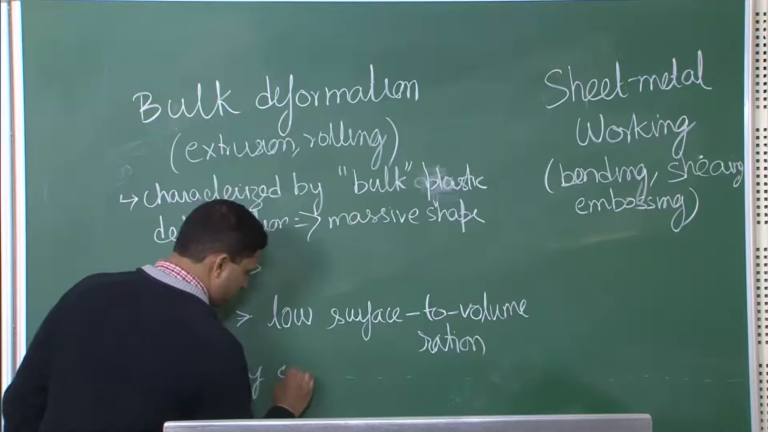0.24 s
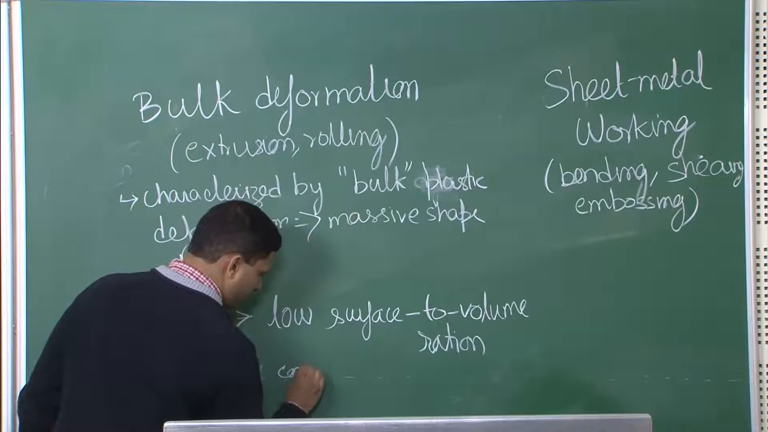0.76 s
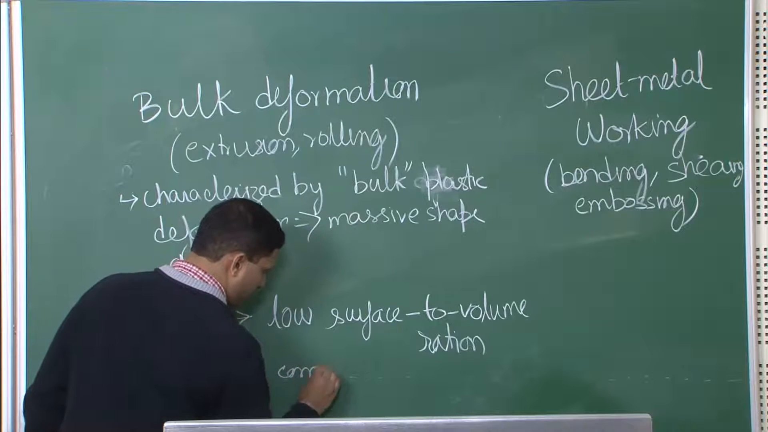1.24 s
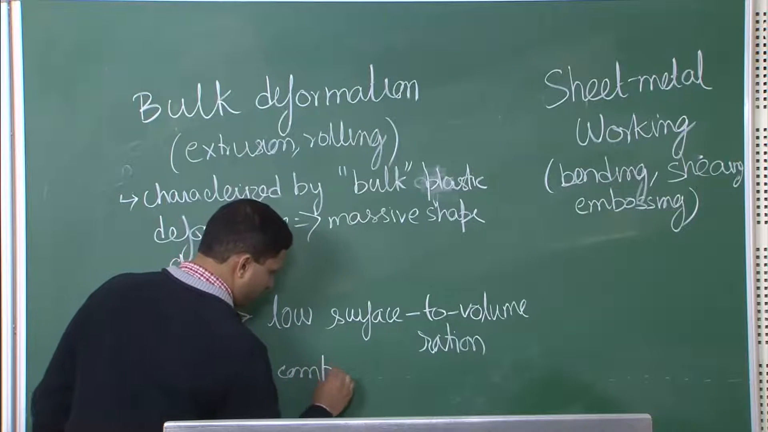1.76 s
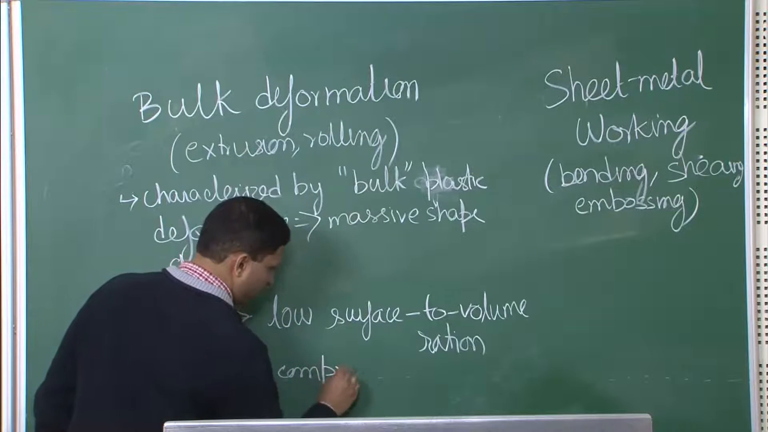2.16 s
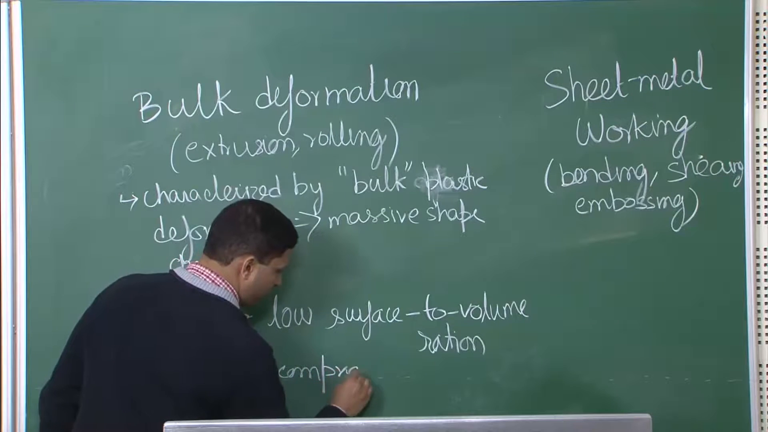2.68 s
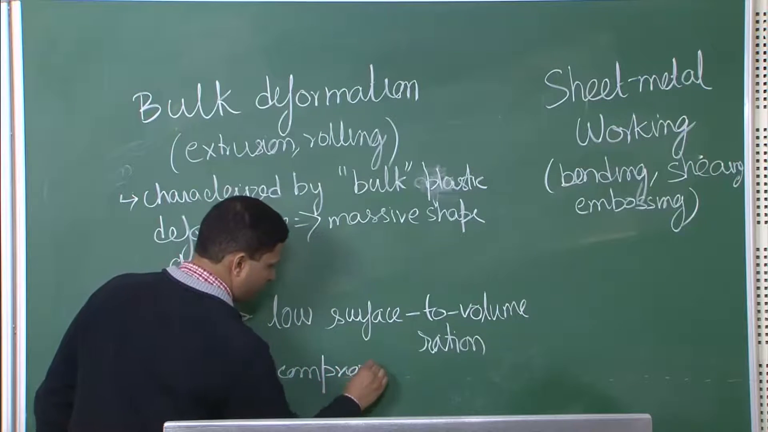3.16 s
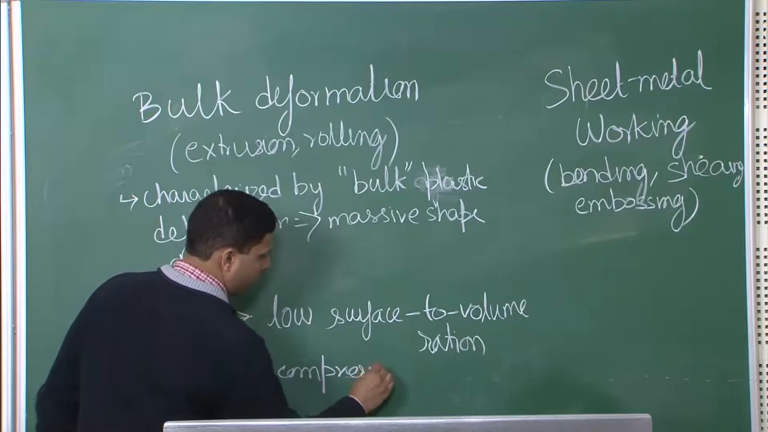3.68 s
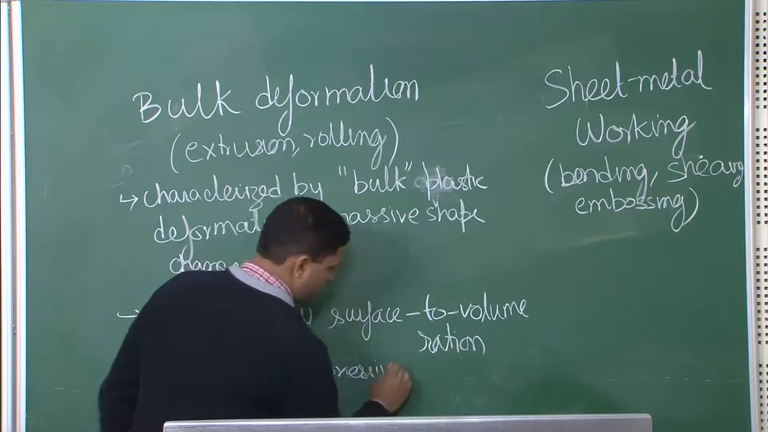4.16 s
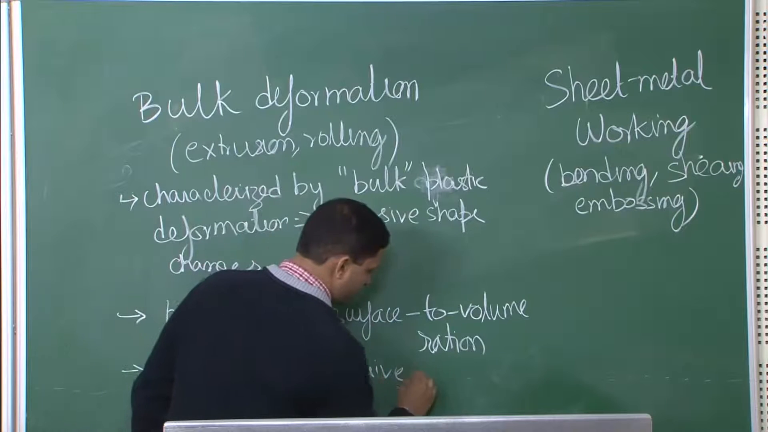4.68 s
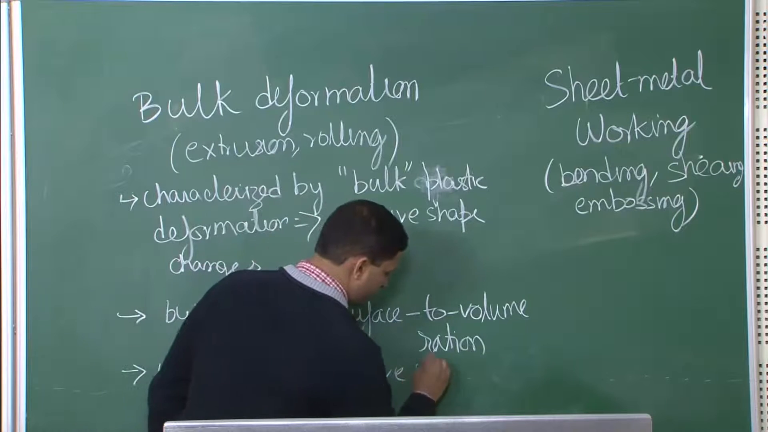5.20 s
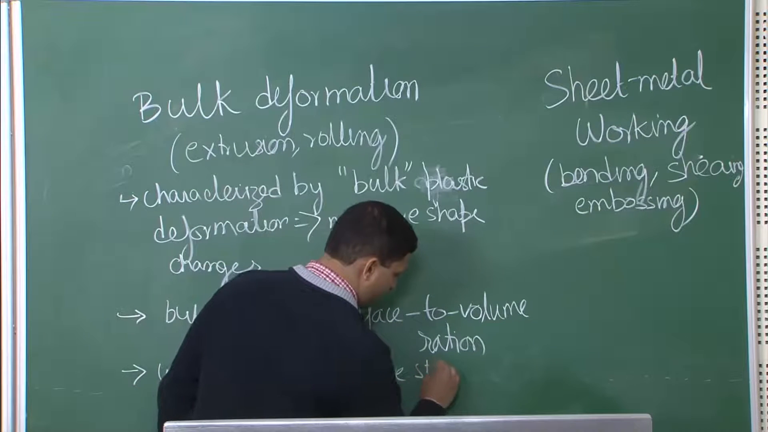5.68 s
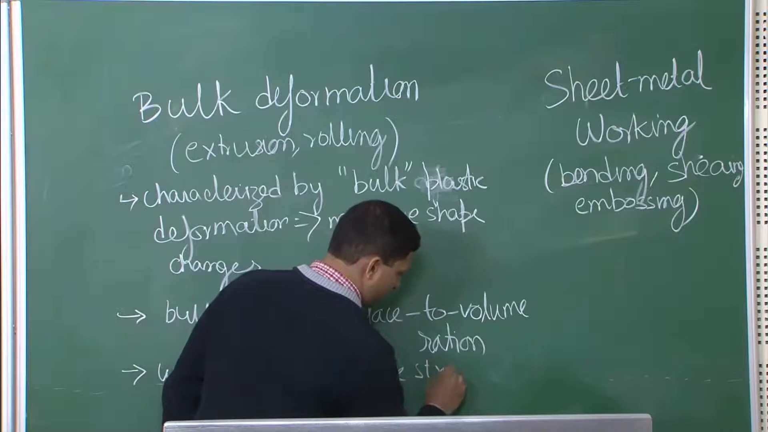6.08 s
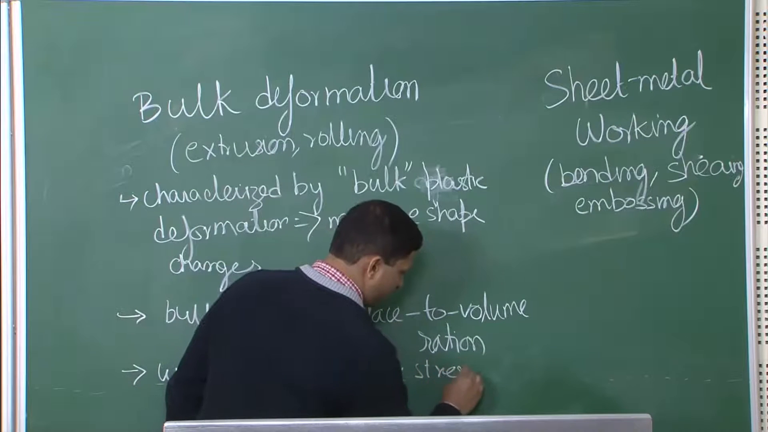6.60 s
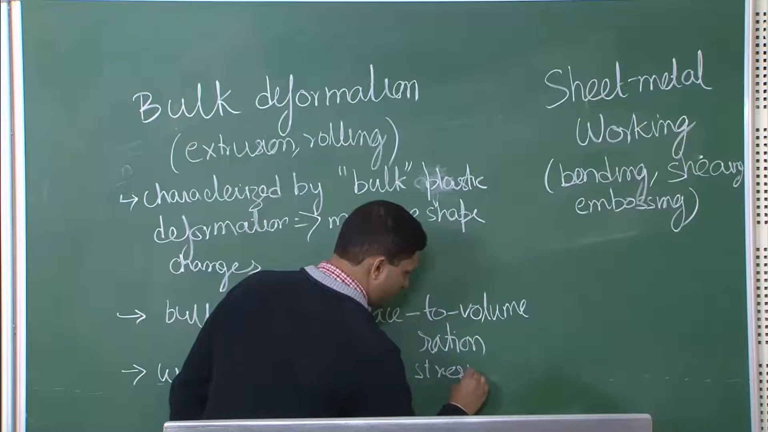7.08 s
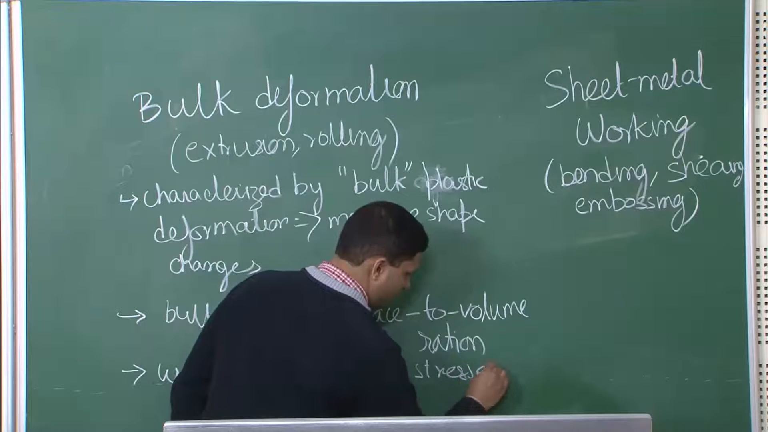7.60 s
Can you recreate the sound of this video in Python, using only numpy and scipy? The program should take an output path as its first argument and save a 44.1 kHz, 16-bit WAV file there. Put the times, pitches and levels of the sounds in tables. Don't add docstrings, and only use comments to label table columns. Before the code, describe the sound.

Quick, hissing chalk strokes and scattered hard clicks of the tip knock a large board in a quiet, lightly echoing room with humming air.

```python
import sys
import numpy as np
from scipy import signal
from scipy.fft import rfft, irfft, next_fast_len
from scipy.io import wavfile
from scipy.ndimage import uniform_filter1d

SR = 44100
rng = np.random.default_rng(int(sys.argv[2]) if len(sys.argv) > 2 else 0)


def transcribe(signal):
    frames = np.atleast_2d(signal).T
    limited = np.clip(frames, -1, 1)
    pcm = np.round(limited * 32767).astype(np.int16)
    wavfile.write(sys.argv[1], SR, pcm)


def volts_from_decibels(level):
    exponent = np.asarray(level, float) / 20
    return 10 ** exponent


N = 346076

# time in seconds, upper over deep boom in dB,
# echo delay off the hand in ms, echo delay off the ledge in ms.
HAND_PLACE = [(1.3, 8, .93, 6.3), (1.69, 8, 1.29, 7.5), (1.99, 6.5, .9, 6.25), (2.4, 7, .93, 6.0),
              (3.5, .4, .65, 6.05), (3.95, -4, .66, 6.45), (4.3, 5, .86, 6.3), (4.8, 3, .9, 6.65),
              (5.66, 0.4, .9, 6.7), (6.05, 5, .86, 6.8), (7.2, 3, .95, 6.25)]


def level(x, db):
    return x * volts_from_decibels(db) / np.sqrt(np.mean(x ** 2))


def coloured(x, points):
    hz, db = np.transpose(points)
    size = next_fast_len(len(x))
    bins = np.fft.rfftfreq(size, 1 / SR) + 1
    gain = volts_from_decibels(np.interp(np.log(bins), np.log(hz), db))
    return irfft(rfft(x, size) * gain, size)[:len(x)]


def resonant(x, peaks):
    size = next_fast_len(len(x))
    bins = np.fft.rfftfreq(size, 1 / SR) + 1
    gain = sum(volts_from_decibels(db) / (1 + ((bins - hz ** 2 / bins) / width) ** 2) for hz, width, db in peaks)
    return irfft(rfft(x, size) * gain, size)[:len(x)]


def decay(t, t60):
    return np.exp(-np.log(1000) * t / t60)


def along(table, s):
    times, *columns = np.transpose(table)
    return [np.interp(s, times, column) for column in columns]


def ventilation():
    # frequency in Hz, spectrum level in dB.
    air = [(18, -48), (30, -16), (80, -9), (137, -7), (186, 0.5), (247, -4.5), (274, -1), (345, -6),
           (592, -12.5), (965, -8.5), (1250, -12.5), (1490, -13), (1610, -12.5), (3150, -29), (14000, -39)]
    # frequency in Hz, width in Hz, level in dB.
    hum_peaks = [(131, 24, -6), (182.6, 16, -0.5), (218, 39, -3), (328.8, 18, 0.5)]
    hum = level(resonant(rng.standard_normal(N), hum_peaks), -64.5)
    return level(coloured(rng.standard_normal(N), air), -62) + hum


def flutter(rate, depth_db):
    size = int(SR / rate)
    steps = np.repeat(rng.standard_normal(N // size + 1), size)[:N]
    return volts_from_decibels(depth_db * uniform_filter1d(steps, size))


def grit(scatter_db):
    size = np.minimum(rng.exponential(size=N), 7.5)
    return rng.standard_normal(N) * volts_from_decibels(scatter_db * size)


def patchy(peaks, rate, depth_db):
    return level(sum(resonant(grit(2.79), [peak]) * flutter(rate, depth_db) for peak in peaks), 0)


def arches():
    # middle in seconds, length in seconds, dust hiss in
    # dB, scrape over hiss in dB, rub over hiss in dB.
    stroke_rows = [(0.01, 0.033, -69, 4, 6), (0.15, 0.13, -64, 6, 0.5), (0.254, 0.087, -68, 3.5, 0),
                   (0.383, 0.093, -63.5, 5.5, 1), (0.503, 0.107, -66.5, 4.5, 4),
                   (0.628, 0.072, -65.5, 0.5, -11), (0.76, 0.12, -66.5, 4, 1.5),
                   (0.876, 0.074, -64, 3, -0.5), (1.006, 0.091, -66, 8, 2), (1.135, 0.097, -66.5, 2, -1),
                   (1.455, 0.13, -61, 3, -3), (1.739, 0.069, -60, 3.5, 2), (1.839, 0.07, -65.5, 6.5, 0),
                   (2.078, 0.089, -64.5, 2, 1.5), (2.234, 0.074, -63, 3.5, 4),
                   (2.491, 0.12, -67, 6, 4), (2.67, 0.14, -66, 3.5, -1.5), (2.765, 0.048, -64.5, 5, 8),
                      (2.83, 0.065, -65.5, -1, 4), (2.925, 0.075, -66, 2, -5),
                      (3.023, 0.061, -68.5, 9.5, 10), (3.102, 0.082, -68.5, 10, 9.5),
                      (3.17, 0.085, -71.5, 5, 9.5), (3.275, 0.065, -69, 8, 2), (3.39, 0.11, -76, 10, 13),
                      (3.587, 0.14, -70, 11.5, 9.5), (3.76, 0.11, -73, 15.5, 15.5),
                      (4.016, 0.11, -69, 10.5, 4.5), (4.146, 0.062, -69, 10, 13),
                      (4.357, 0.085, -71.5, 6, -8), (4.456, 0.062, -70, 9, 13.5),
                      (4.594, 0.16, -69, 7.5, -1), (4.661, 0.024, -64, 11.5, 10),
                      (4.912, 0.06, -64, 9.5, 1), (5.005, 0.073, -66.5, 7.5, 5),
                   (5.312, 0.117, -67, 7.5, 4), (5.566, 0.019, -64.5, 13.5, 13),
                    (5.753, 0.073, -61, 1.5, 1), (5.896, 0.087, -67, 0.5, 10.5), (6.079, 0.055, -66, 0, 3),
                    (6.175, 0.081, -63.5, 4, 3.5), (6.298, 0.077, -68.5, 4, 3), (6.382, 0.15, -67, 5, 2),
                    (6.523, 0.065, -63.5, 1, 2), (6.616, 0.075, -62, 2, -4.5), (6.702, 0.052, -65, 1.5, -4),
                    (6.8, 0.056, -67, 7, 2), (6.857, 0.03, -63.5, 2.5, 1), (6.955, 0.075, -61.5, -1.5, -3),
                    (7.055, 0.066, -72.5, 9, 3), (7.275, 0.11, -66.5, 6, 3), (7.401, 0.07, -63, 1.5, -1),
                    (7.482, 0.1, -62.5, 5.5, 0), (7.599, 0.069, -60.5, 0.5, -1.5),
                    (7.713, 0.076, -61, -0.5, -4.5), (7.796, 0.051, -60.5, 4.5, -2.5)]
    edge_db, squareness, lifted_db = 5, 3.3, -81
    t = np.arange(0, N + 64, 64) / SR
    letters = np.array(stroke_rows)
    mid, length, hiss_db, scrape_db, rub_db = letters.T[:, :, None]
    place = np.abs(2 * (t - mid) / length)
    power_law = np.where(t > mid, squareness / 0.98, squareness)
    arch = volts_from_decibels(hiss_db - edge_db * place ** power_law) ** 2
    tilt_db = 0.11 * (rub_db - scrape_db + 4)
    low_db = scrape_db + tilt_db - 3.5
    high_db = scrape_db - tilt_db - 3
    power = [volts_from_decibels(lifted_db) ** 2 + np.sum(arch * volts_from_decibels(db) ** 2, axis=0)
             for db in (0, low_db, high_db, rub_db)]
    return [np.interp(np.arange(N) / SR, t, np.sqrt(p)) for p in power]


def strokes():
    # frequency in Hz, width in Hz, level in dB.
    dust_peaks = [(4840, 2900, -5), (6480, 1040, -4), (6980, 800, -7), (8140, 2700, -6), (9600, 1300, -13),
                  (11000, 2100, -11), (12000, 1100, -15.5), (13400, 1100, -20)]
    # frequency in Hz, width in Hz, level in dB.
    scrape_peaks = [(2116, 400, -0.5), (2530, 1120, -3), (3000, 1130, 0.5), (3620, 900, 2.5),
                    (4000, 910, -8), (4670, 640, -8.5)]
    # frequency in Hz, width in Hz, level in dB.
    rub_peaks = [(470, 340, -14), (772, 430, -7), (1140, 400, -5), (1577, 500, -6)]
    # frequency in Hz, width in Hz, level in dB.
    rumble_peaks = [(125, 36, -14), (169, 50, 6), (254, 187, -3), (310, 58, -4.5), (446, 36, -10)]
    # frequency in Hz, width in Hz, level in dB.
    flecks = [(2160, 67, -3.5), (2400, 86, 4), (2990, 180, 3), (3313, 140, 1.5), (3660, 76, -1.5),
              (4230, 140, -1.5)]
    # frequency in Hz, width in Hz, level in dB.
    fine_flecks = [(6560, 190, -1.5), (6830, 170, 7), (7310, 230, 4)]
    # time in seconds, rumble in dB.
    leaning = [(0, -59.5), (1.3, -65.5), (2.2, -67), (3.5, -71.5), (5, -70.5), (6.2, -71), (7.85, -65)]
    hiss, low, high, rub = arches()
    lean = np.hypot(volts_from_decibels(along(leaning, np.arange(N) / SR)[0]), rub * volts_from_decibels(-1.5))
    dust = patchy(dust_peaks, 14, 3.0) + volts_from_decibels(-8) * patchy(fine_flecks, 20, 7)
    body = low * patchy(scrape_peaks[:2], 22, 3.0)
    body = body + high * patchy(scrape_peaks[2:], 22, 3.5)
    body = body + rub * patchy(rub_peaks, 25, 2.2)
    body = body + high * volts_from_decibels(-5) * patchy(flecks, 40, 8)
    rumble = level(resonant(rng.standard_normal(N), rumble_peaks), 0)
    chatter = flutter(90, 1.1)
    t = np.arange(SR // 2) / SR
    walls = rng.standard_normal(len(t)) * decay(t, 0.82)
    walls = walls * volts_from_decibels(-12.5) / np.sqrt(np.sum(walls ** 2))
    wet = signal.fftconvolve(body, walls)[:N]
    return (hiss * dust + body) * chatter + wet + lean * rumble


def ring(t, hz, t60):
    return (t > 0) * np.sin(2 * np.pi * hz * t) * decay(np.maximum(t, 0), t60)


def boom(t, modes):
    return sum(sign * volts_from_decibels(db) * ring(t - (lag_ms + 0.28) / 1000, hz, t60)
               for hz, db, t60, lag_ms, sign in modes)


def echoes(s, contact_ms, chance):
    bounce_db = -3 - 104 * max(contact_ms - 0.13, 0)
    hand_db, ledge_db = np.array([-3, -9]) + 1.2 * chance
    _, hand_ms, ledge_ms = along(HAND_PLACE, s)
    return (0.371, bounce_db), (hand_ms, hand_db), (ledge_ms, ledge_db)


def room(t, path):
    # frequency in Hz, level in dB, 60 dB decay time in seconds.
    near_tail = [(234, -25, 0.54), (870, -22, 0.049), (1620, -33.5, 0.15), (2260, -19, 0.037),
                 (3380, -31, 0.023), (4300, -19, 0.034), (7340, -32, 0.17)]
    # frequency in Hz, level in dB, 60 dB decay time in seconds.
    far_tail = [(1000, -46.5, 0.6), (1900, -38, 0.39), (3220, -35, 0.3)]
    bounce, (hand_ms, hand_db), (ledge_ms, ledge_db) = path
    second_returns = [(2 * hand_ms, 2 * hand_db - 6), (2 * ledge_ms, 2 * ledge_db - 5)]
    response = 1. * (t == 0)
    for ms, db in [bounce, (hand_ms, hand_db), (ledge_ms, ledge_db)] + second_returns:
        response += volts_from_decibels(db) * np.sinc(t * SR - ms * SR / 1000)
    build_up = 1 - np.exp(-t / 0.00022)
    for hz, db, t60 in near_tail + far_tail:
        band = resonant(rng.standard_normal(len(t)), [(hz, 0.84 * hz, 0)])
        response += volts_from_decibels(db) * band * decay(t, t60) * build_up
    return response


def taps():
    # start in seconds, peak in dB, board boom in dB, sparkle in dB, contact in ms.
    landings = [(1.218, -49, -69, -65, 0.18), (1.3284, -30.5, -41.5, -59, 0.62),
                (1.5526, -46.5, -64, -65, 0.17), (1.6849, -27.5, -39.5, -56, 0.2),
                (1.9945, -21.5, -38, -43.5, 0.26), (2.3921, -31, -44, -53.5, 0.33),
                (3.5292, -20.5, -42, -49, 0.26), (3.691, -42.5, -66, -73, 0.67),
                (3.769, -21.5, -37, -69, 0.3), (3.9346, -18, -37.5, -40.5, 0.24),
                (4.31, -38, -52.5, -59, 0.43), (4.8183, -24.5, -38.5, -55, 0.32),
                (5.2068, -18.5, -36, -43, 0.24), (5.5055, -20.5, -38.5, -43.5, 0.24),
                (5.653, -23, -38.5, -56, 0.31), (6.0496, -27.5, -43.5, -41.5, 0.33),
                (6.845, -45, -79, -75, 0.19), (7.1846, -27.5, -46.5, -53, 0.24)]
    # frequency in Hz, level in dB, 60 dB decay time in seconds.
    stick_modes = [(1000, -4, .008), (1450, 1, .008), (2140, -1.5, .007), (2950, -2, .005),
                   (3600, -2.5, .004), (4300, -7, .004)]
    # frequency in Hz, level in dB, 60 dB decay in seconds, lag in ms, sign.
    deep_modes = [(99, 2, 0.15, 3.8, -0.65), (119.4, 7, 0.1, 1.4, -0.87), (177, -1.5, 0.15, 0.36, 0.81)]
    # frequency in Hz, level in dB, 60 dB decay in seconds, lag in ms, sign.
    upper_modes = [(228.6, 1, 0.073, 0.6, 0.57), (300.3, -1, 0.046, 0.86, 0.97),
                   (402, -21, 0.17, 0.24, 0.27)]
    t = np.arange(int(.3 * SR)) / SR
    out = np.zeros(N + len(t))
    deep, upper = boom(t, deep_modes), boom(t, upper_modes)
    for s, peak_db, deep_db, sparkle_db, contact_ms in landings:
        path = echoes(s, contact_ms, rng.standard_normal(2))
        upper_db = deep_db + along(HAND_PLACE, s)[0]
        contact = max(contact_ms, .08) / 1000
        push = np.exp(-((t - .0005) / (.3 * contact)) ** 2)
        grip = rng.standard_normal((len(stick_modes), 2))
        stick = sum(volts_from_decibels(db + 2.5 * louder) * ring(t, hz * (1 + .04 * higher), t60)
                    for (hz, db, t60), (louder, higher) in zip(stick_modes, grip))
        struck_stick = np.convolve(stick, push[:64] ** 2 / np.sum(push ** 2))[:len(t)]
        recoil = .95 * np.exp(-((t - .0005 - .85 * contact) / (.33 * contact)) ** 2)
        click = recoil - push - volts_from_decibels(-10.5) * struck_stick
        crumbs = rng.standard_normal(len(t)) * np.exp(-t / 0.00033) * (t > 0)
        sparkle = np.roll(resonant(crumbs, [(8450, 3200, 0)]), shift=SR // 2800)
        sharp = volts_from_decibels(peak_db + 1.0) * click + volts_from_decibels(sparkle_db + 9.0) * sparkle
        at = int((s - .0003) * SR)
        out[at:at + len(t)] += signal.fftconvolve(sharp, room(t, path))[:len(t)]
        out[at:at + len(t)] += volts_from_decibels(deep_db + 1.5) * deep + volts_from_decibels(upper_db + 3.5) * upper
    return out[:N]


def scene():
    return (ventilation() + strokes() + taps())[None]


def low_pass(x):
    return signal.sosfilt(signal.butter(12, 14870, fs=SR, output="sos"), x)


def record(dry):
    # frequency in Hz, gain in dB.
    mic_top = [(14250, 0), (14500, -30), (22050, -60)]
    low_cut = signal.butter(2, 75, "high", fs=SR, output="sos")
    heard = signal.sosfilt(low_cut, coloured(dry[0], mic_top))
    self_noise = coloured(rng.standard_normal(N), [(10, -3), (70, 22), (200, -45)])
    heard = heard + level(self_noise, -89)
    top_hz, top_keep_db = 13650, -92
    top = coloured(heard, [(top_hz - 40, -120), (top_hz, 0)])
    weak = uniform_filter1d(top ** 2, size=1024) < volts_from_decibels(top_keep_db) ** 2
    mix = heard - top * uniform_filter1d(1. * weak, size=512)
    return low_pass(mix[None])


dry = scene()
out = record(dry)
transcribe(out)
```